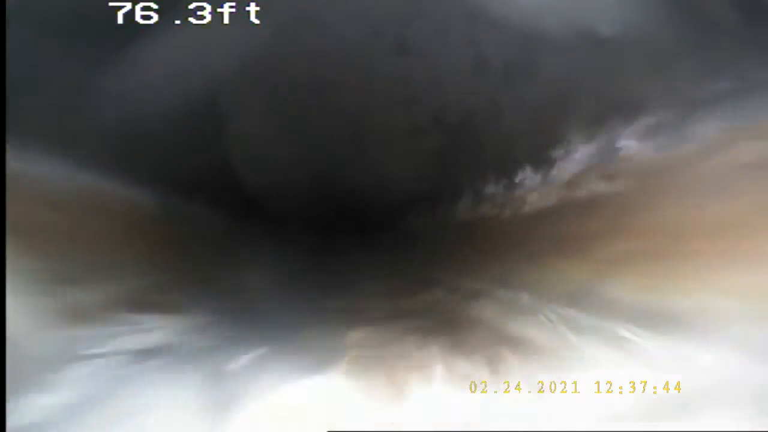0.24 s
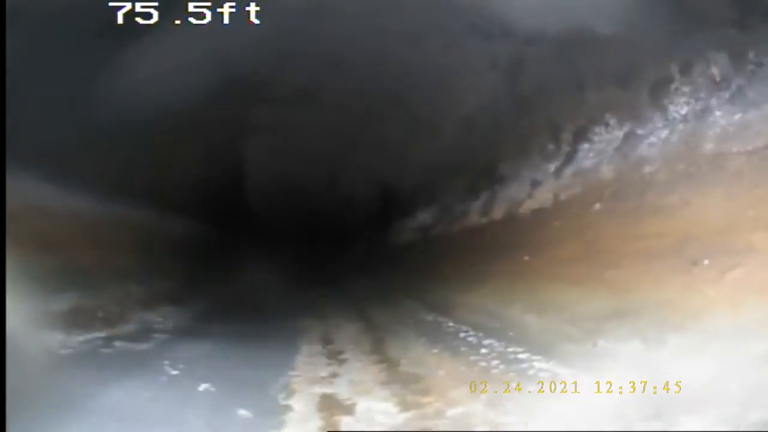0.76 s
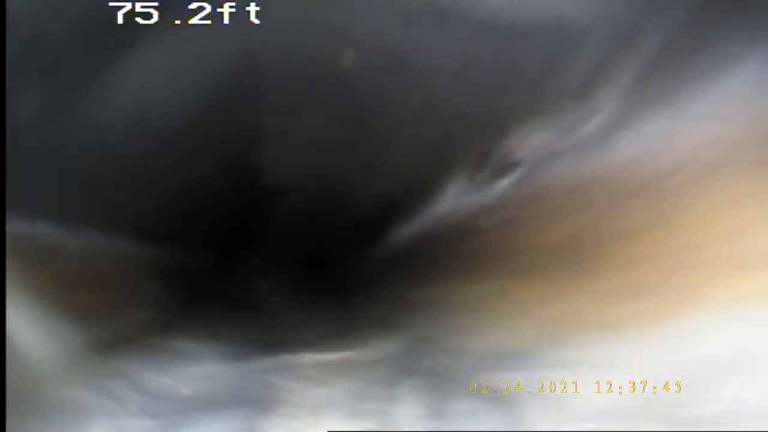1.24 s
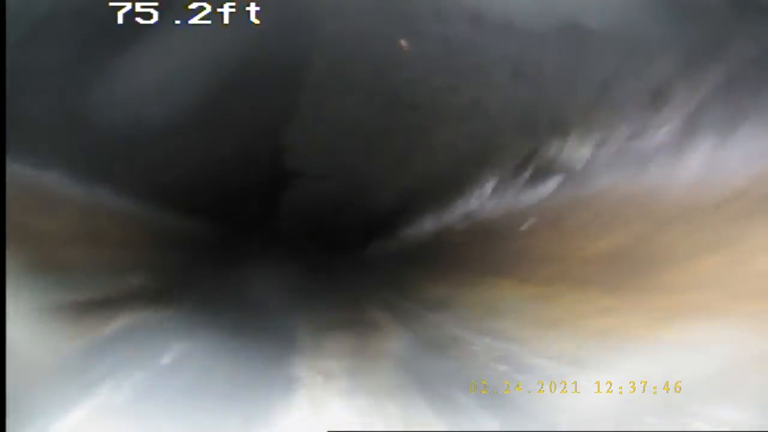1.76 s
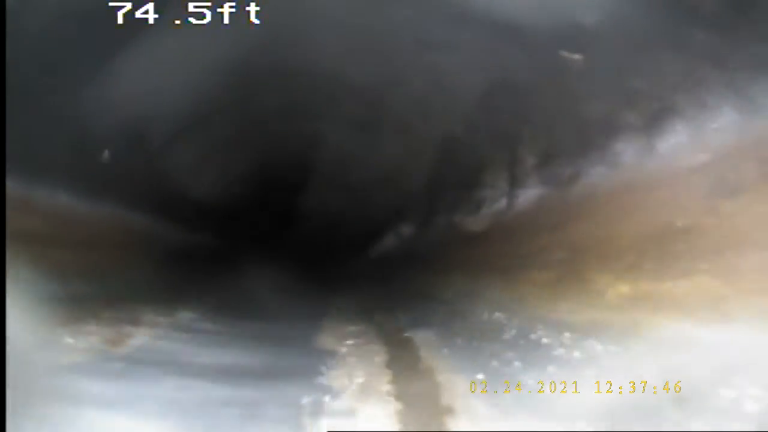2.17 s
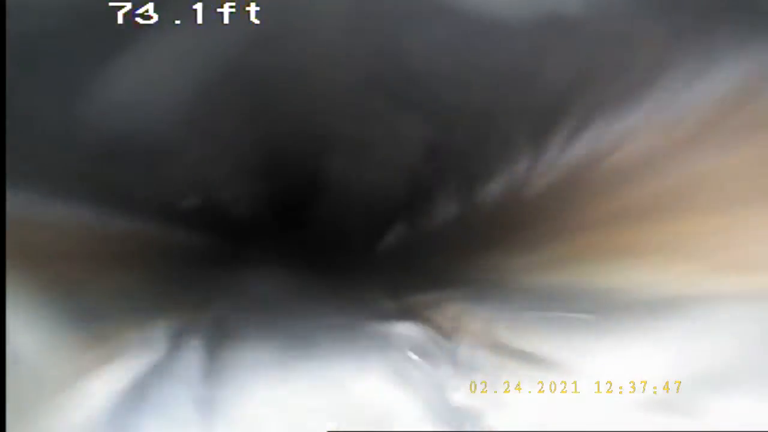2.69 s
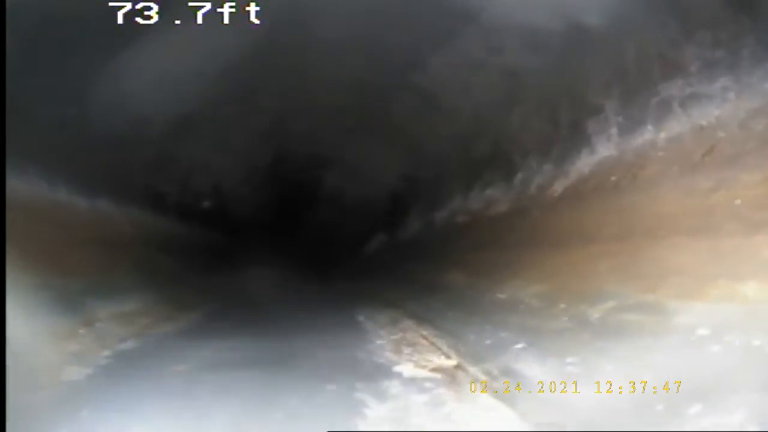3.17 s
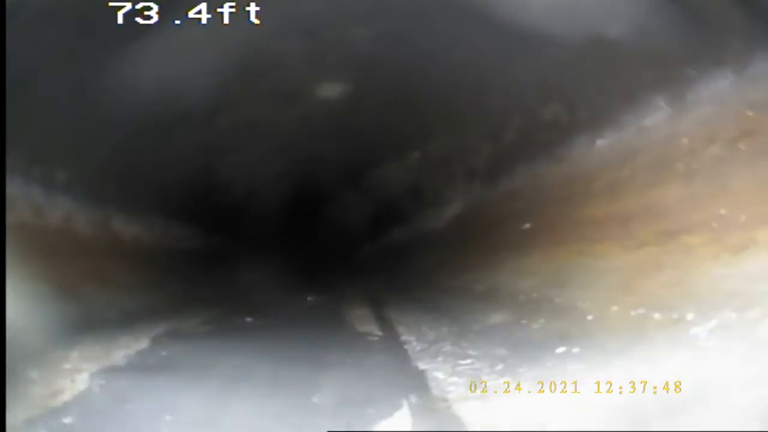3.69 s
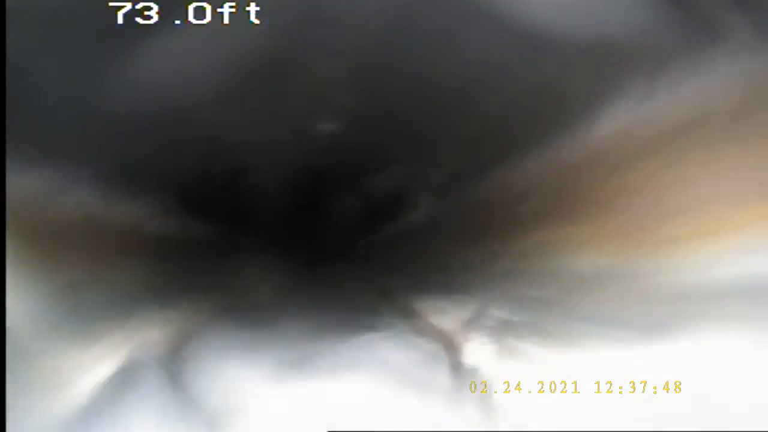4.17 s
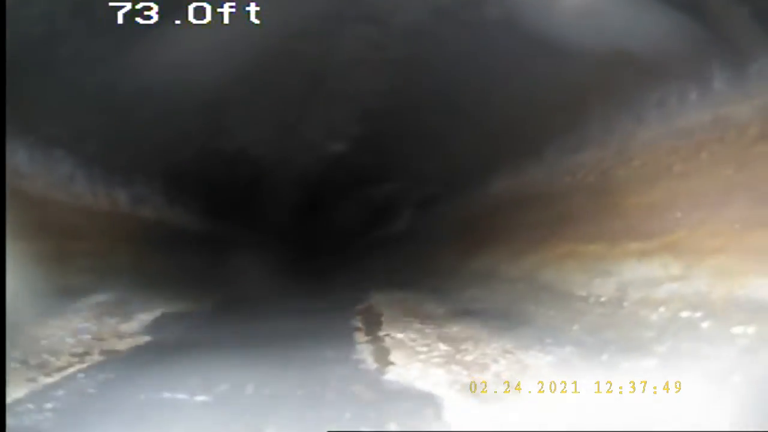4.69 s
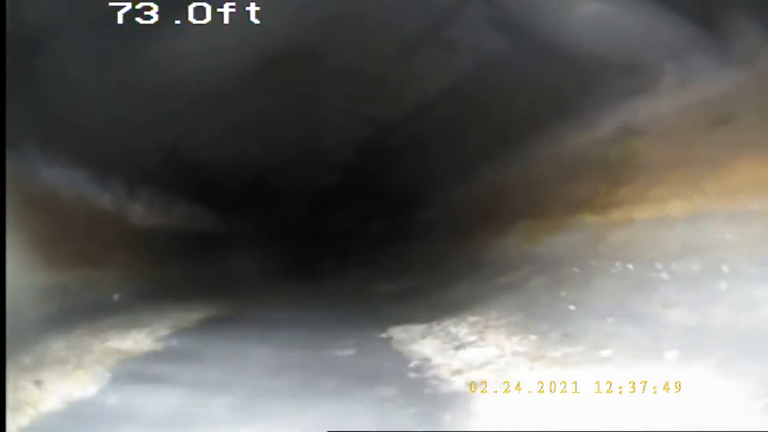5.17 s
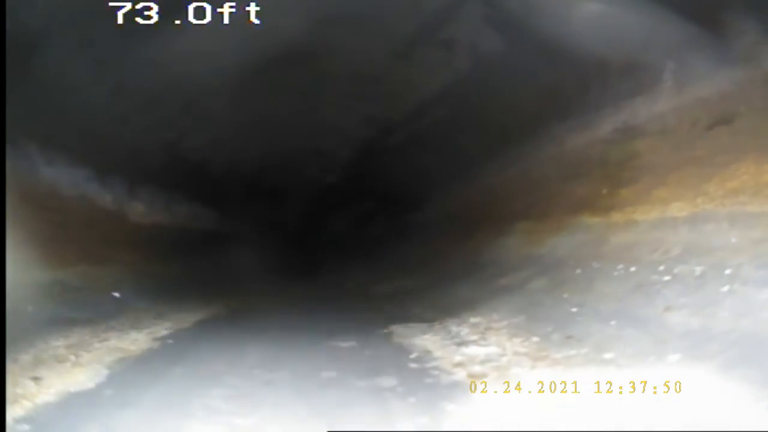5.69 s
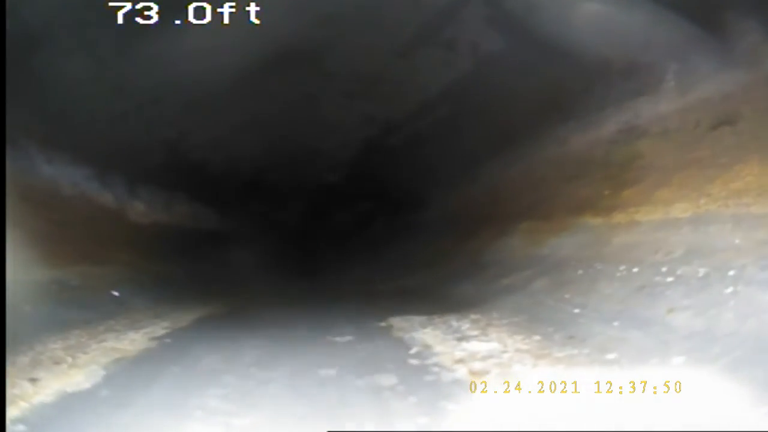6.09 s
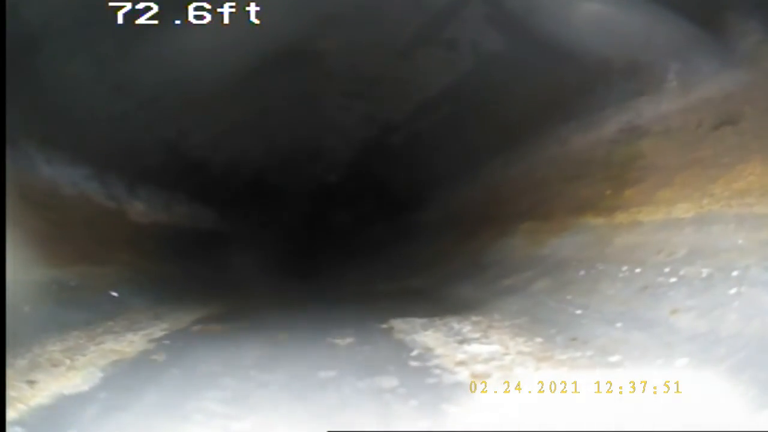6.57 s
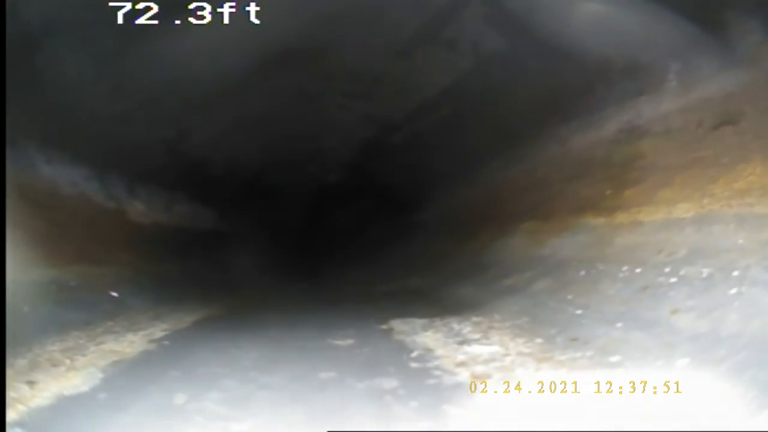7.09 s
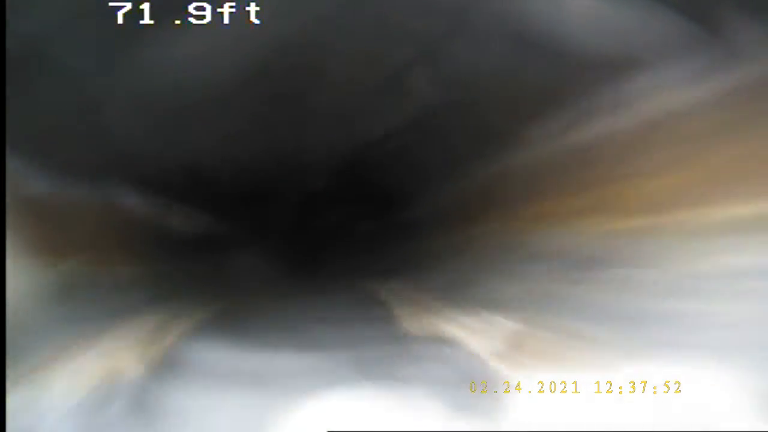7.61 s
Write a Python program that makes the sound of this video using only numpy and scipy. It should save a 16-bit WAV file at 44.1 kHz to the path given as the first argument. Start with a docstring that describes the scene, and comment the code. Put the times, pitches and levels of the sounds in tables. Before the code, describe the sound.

Close, boxy, dull-toned sound picked up through a cable reel: rough scraping strokes two or three times a second, each shaking the frame with a deep wooden-metallic rumble. Early knocks are moderate, then it calms to quieter drags. Hard overloaded thuds with clacks come past the middle, followed by two cracking whips against the wire cage. It finishes with smaller pulls and crisp ticks over near-silence between tugs, with no room echo.

```python
"""A stiff inspection cable is dragged out of a pipe, hand over hand, onto its reel: slips rasp and shake the reel.
Fine slips excite jacket and guide resonances; coarse ones drive the frame, drum and cage.
Now and then filtered noise bursts tick, clink, slap and jolt against the reel.
Everything passes one narrow-band input that clips, cracks at set peaks and adds faint hiss."""
import sys
import numpy as np
from scipy import signal
from scipy.fft import rfft, irfft
from scipy.io import wavfile
from scipy.ndimage import uniform_filter1d

SR = 44100
rng = np.random.default_rng(int(sys.argv[2]) if len(sys.argv) > 2 else 0)


def pcm_store(signal):
    """Save signal as 16-bit PCM."""
    levels = np.round(np.clip(np.atleast_2d(signal), -1, 1) * 32767)
    wavfile.write(sys.argv[1], SR, levels.astype(np.int16).T)


N = 346185
TIME_S = np.arange(N) / SR
CLOCK_S = np.arange(0, N / SR, .002)  # coarse grid for levels


# Resonances of the swaying frame: centre_hz [Hz], width_hz [Hz], level_db [dB relative]
FRAME_MODES = [(74.3, 24, -7.5), (101.76, 18, 7), (125.6, 22.2, 6)]
# Resonances of the reel drum: centre_hz [Hz], width_hz [Hz], level_db [dB relative]
DRUM_MODES = [(177.2, 24, 5)]
# Resonances of the wire cage: centre_hz [Hz], width_hz [Hz], level_db [dB relative]
CAGE_MODES = [(232.5, 59, -0.5), (268.6, 21, 4.5), (309, 51, 3.5), (377, 27, 2), (432, 120, -3),
              (468, 39.3, 2), (504.3, 89, -4), (555.3, 58, -8)]
# Hollow ring of the guide: centre_hz [Hz], width_hz [Hz], level_db [dB relative]
GUIDE_MODES = [(669, 110, -7.5), (757, 68, -3.5), (953, 210, -6), (1043, 96, -0.5), (1113, 41, 0),
               (1258, 130, -3), (1473, 65, 5), (1597, 65, -6.5)]
# Sliding cable jacket: centre_hz [Hz], width_hz [Hz], level_db [dB relative]
JACKET_MODES = [(1140, 550, -3), (1943, 190, 2.5), (2166, 220, -2), (2520, 880, -6), (3204, 420, -3.5),
                (3790, 770, -11)]
# fall in dB per s, level between pulls in dB
FRAME_SETTLES, DRUM_SETTLES, CAGE_SETTLES = (107, -34), (91, -40), (135, -43)
CREEP_DB, CREEP_DB_PER_DB = -45.5, .36  # faint rasp between pulls follows the rattle
GUIDE_DB, GUIDE_DB_PER_DB = -30.5, .55  # the cage's rattle stirs the guide
CHATTER_DB = -23.5  # cable against the rattling cage, relative to the rattle
HEAVY_DB, HEAVY_DB_PER_DB = -15.5, .47  # rumble at which the deepest modes take over, and how abruptly
SUB_DB, SUB_DB_PER_DB = -33.5, .35  # deepest rumble follows the frame
LOWEST_HZ = 36  # the frame hardly moves below this


def dragging():
    """Coarse slips shake frame, drum and cage; fine ones rasp along the jacket and ring the guide."""
    rumble_db = shaken(*FRAME_SETTLES, part=0)
    hum_db = shaken(*DRUM_SETTLES, part=1)
    rattle_db = shaken(*CAGE_SETTLES, part=2)
    rasp_db = sliding(CREEP_DB + CREEP_DB_PER_DB * rattle_db, part=0)
    guide_db = sliding(GUIDE_DB + GUIDE_DB_PER_DB * rattle_db, part=1)
    coarse = slips(per_s=220, spread_db=4.5)
    fine = slips(per_s=9000, spread_db=3.0)

    sway = 1 / (1 + amp(-HEAVY_DB_PER_DB * (rumble_db - HEAVY_DB)))  # 0 light, 1 heavy
    frame = loaded(FRAME_MODES, sway, light_db_per_oct=8, heavy_db_per_oct=-8, seconds=.093)
    highpass = signal.butter(2, LOWEST_HZ, "highpass", fs=SR, output="sos")
    frame = signal.sosfiltfilt(highpass, frame)
    drum = steadied(ring(coarse, DRUM_MODES, order=3), seconds=.08)
    cage = loaded(CAGE_MODES, sway, light_db_per_oct=2, heavy_db_per_oct=-3.5, seconds=.07)
    sub_bass = amp(SUB_DB + SUB_DB_PER_DB * rumble_db) * ring(rng.standard_normal(N), [(39, 270, 0)])
    shaking = amp(rumble_db) * frame + amp(hum_db) * drum + amp(rattle_db) * cage + sub_bass

    guide = amp(guide_db) * shifting(fine + .5 * coarse, GUIDE_MODES, swell_db=4.0)
    chatter = amp(CHATTER_DB + rattle_db) * ring(fine, CABLE_MODES[1:])
    rasp = amp(rasp_db) * shifting(fine, JACKET_MODES, swell_db=2.5)
    return shaking + guide + chatter + rasp


# Strokes of the cable through the guide, one per pull: start_s [s], end_s [s], jacket_rasp_db [dB],
# guide_ring_db [dB], frame_rumble_db, drum_hum_db, cage_rattle_db [dB, before the breakaway boost]
PULLS = [(0.118, 0.42, -46, -38, -24, -22.5, -31), (0.484, 0.682, -51.5, -49.5, -36.5, -45, -53),
         (0.881, 1.177, -48, -43.5, -28.5, -30.5, -40), (1.248, 1.402, -45, -53, -25, -26.5, -34),
         (1.677, 1.978, -48, -41.5, -30, -26, -36), (2.054, 2.189, -48, -60, -28.5, -29.5, -37),
         (2.457, 2.72, -48, -43.5, -43.5, -26, -37), (2.809, 3.02, -50.5, -59.5, -36.5, -39, -44),
         (3.168, 3.464, -48.5, -40.5, -29.5, -20.5, -36), (3.512, 3.739, -48.5, -50, -21, -27.5, -31.5),
         (3.908, 4.24, -51, -42, -28.5, -27, -33), (4.329, 4.514, -43, -38, -28.5, -25.5, -22),
         (4.862, 5.076, -49.5, -62, -26, -43.5, -44), (5.177, 5.787, -46.5, -45, -26.5, -35.5, -26.5),
         (5.512, 5.55, -31, -26, -31.5, -33, -50), (6.132, 6.488, -53, -42.5, -37, -32, -39),
         (6.636, 6.944, -51, -44.5, -34.5, -27.5, -35), (6.946, 7.06, -40, -34.5, -46, -28, -36.5),
         (7.096, 7.384, -58, -45, -48, -39, -39.5), (7.418, 7.607, -42.5, -36.5, -29.5, -27, -32.5),
         (7.704, 7.88, -49, -40.5, -37, -27, -33)]
# The cable catches and the reel lurches: peak_s [s], build_up_s [s], frame_rumble_db [dB],
# drum_hum_db [dB], cage_rattle_db [dB]
LURCHES = [(0.0, .03, -19.5, -28, -33), (0.383, 0.024, -12.5, -12.5, -18.5), (0.575, 0.035, -17, -48, -24),
           (0.969, 0.082, -27, -22, -27), (2.625, 0.091, -15.5, -22, -33.5), (2.899, 0.06, -21.5, -26, -28),
           (3.065, 0.068, -16, -21, -45), (3.662, 0.08, -11, -18.5, -20), (4.42, 0.051, -5.5, -31.5, -24),
           (4.692, 0.16, -23, -50.5, -33), (4.971, 0.12, -8.5, -17, -17), (5.26, 0.053, -5.5, -27.5, -15),
           (5.535, .065, -16, -18, -34.5), (5.703, 0.084, -3.5, -18, -11),
           (6.061, 0.088, -12, -18.5, -21.5), (6.249, 0.073, -16.5, -27.5, -22.5)]
PULL_RISE_S = .076
BREAKAWAY_DB, BREAKAWAY_S = 10, .047  # shakes hardest as the cable breaks free, then settles


def shaken(fall_db_per_s, rest_db, part):
    """Level in dB of a reel part (0 frame, 1 drum, 2 cage): pulls and lurches add power, which then falls."""
    power = amp(rest_db) ** 2
    for start_s, end_s, _, _, *part_db in PULLS:
        breakaway_db = BREAKAWAY_DB * np.exp(-np.maximum(CLOCK_S - start_s, 0) / BREAKAWAY_S)
        push = swell(start_s, PULL_RISE_S, end_s, fall_db_per_s)
        power = power + (amp(part_db[part] + breakaway_db) * push) ** 2
    for peak_s, rise_s, *part_db in LURCHES:
        push = swell(peak_s - rise_s, rise_s, peak_s, fall_db_per_s)
        power = power + (amp(part_db[part]) * push) ** 2
    return np.interp(TIME_S, CLOCK_S, 10 * np.log10(power))


def swell(start_s, rise_s, end_s, fall_db_per_s):
    """Attack, hold and release of a push on the reel."""
    attack = np.clip((CLOCK_S - start_s) / max(rise_s, .005), 0, 1)
    return attack * amp(-fall_db_per_s * np.maximum(CLOCK_S - end_s, 0))


STROKE_RAMP_S = .09  # gathers speed and stops in this time


def sliding(creep_db, part):
    """Level in dB of the rasp (0 jacket, 1 guide): strokes gather speed, slide evenly, stop; creep fills between."""
    strokes = 0
    for start_s, end_s, *part_db in PULLS:
        ramp = np.minimum(CLOCK_S - start_s, end_s - CLOCK_S) / STROKE_RAMP_S + .5
        strokes = strokes + amp(part_db[part]) ** 2 * np.clip(ramp, 0, 1) ** 3
    return 10 * np.log10(np.interp(TIME_S, CLOCK_S, strokes) + amp(creep_db) ** 2)


def slips(per_s, spread_db):
    """Stick-slip: a train of tiny snaps of uneven size and either sign."""
    size = amp(spread_db * np.minimum(rng.exponential(1, N), 4)) * rng.choice([-1, 1], N)
    return evened(size * (rng.random(N) < per_s / SR))


def loaded(modes, sway, light_db_per_oct, heavy_db_per_oct, seconds):
    """Slips shake a reel part; its spectral tilt goes from light to heavy as the sway grows."""
    def shake(tilt):
        snaps = slips(per_s=400, spread_db=2.5)
        return steadied(ring(snaps, modes, tilt_db_per_oct=tilt, order=3), seconds)
    light, heavy = shake(light_db_per_oct), shake(heavy_db_per_oct)
    return np.sqrt(1 - sway) * light + np.sqrt(sway) * heavy


def shifting(x, modes, swell_db):
    """The point of contact moves, so each resonance swells and fades on its own."""
    total = 0
    for hz, width_hz, db in modes:
        level = amp(db + swell_db * wander(hz=18)) * np.sqrt(width_hz)
        total = total + level * ring(x * rng.choice([-1, 1], N), [(hz, width_hz, 0)])
    return evened(total)


# Heavy jolts of the reel: start_s [s], level_db [dB relative], decay_t60_s [s], guide_clack_db [dB]
JOLTS = [(0.154, -14, 0.18, -24.5), (0.367, -11.5, 0.16, -27.5), (0.521, -12.5, 0.23, -30.5),
         (1.302, -19.5, 0.07, -30), (3.22, -16.5, 0.25, -32.5), (3.641, -3.5, 0.22, -25),
         (4.228, -17, 0.14, -43), (4.394, -6.5, 0.32, -26), (4.423, -2.5, 0.14, -20.5),
         (5.228, -11, 0.32, -30.5), (5.501, -11.5, 0.19, -42), (5.674, -8.5, 0.21, -26),
         (6.046, -10.5, 0.07, -25.5), (6.077, -10.5, 0.064, -34.5), (6.247, -15, 0.15, -27.5),
         (6.69, -18, 0.28, -30.5)]


def snags(depth=.14, seconds=.2):
    """Gain that dips just before each jolt as the cable catches, then recovers fast as it breaks free."""
    held = 0
    for s, *_ in JOLTS:
        before = np.clip(1 - (s - TIME_S) / seconds, 0, 1)
        after = np.clip(1 - (TIME_S - s) / .0069, 0, 1)
        held = held + before * after
    return 1 - np.clip(depth * held, 0, 1)


def jolts():
    """Heavy knocks ring frame and cage together, with a short clack in the guide."""
    out = np.zeros(N)
    for s, db, t60_s, clack_db in JOLTS:
        force = burst(t60_s, rise_s=.00018)
        low = evened(ring(force, FRAME_MODES, tilt_db_per_oct=1.5))
        mid = evened(ring(force, CAGE_MODES))
        add(out, s, amp(db) * force.std() * amp(-2.0) * (low + mid))
        add(out, s, amp(clack_db) * ring(burst(t60_s=.12, rise_s=.001), GUIDE_MODES))
    return out


# Hard whips against the cage: start_s [s], crack_db [dB], crack_t60_s [s, burst floor 0.01],
# clatter_db [dB], clang_db [dB]
SLAPS = [(6.021, 3.5, 0.0079, -3.5, -9), (6.241, 0.5, 0.036, -6.5, 3)]
# Thin cage wires when struck: centre_hz [Hz], width_hz [Hz], level_db [dB relative]
WIRE_MODES = [(993, 120, 0), (1245, 210, -1.5), (1480, 62, 2.5), (1993, 81, 0.5)]
# Cage hoop when struck: centre_hz [Hz], width_hz [Hz], level_db [dB relative]
HOOP_MODES = [(517, 206, -4.5), (1128, 64, -5)]


def slaps():
    """Higher bending waves run faster: bright crack and wire clatter start together, the hoop clangs 3.3 ms later."""
    crack, clatter, clang = np.zeros((3, N))
    for s, crack_db, t60_s, clatter_db, clang_db in SLAPS:
        add(crack, s, amp(crack_db) * burst(t60_s, rise_s=.00095))
        add(crack, s - .006, amp(-14.5) * burst(t60_s=.042, rise_s=.012))  # the cable grazes first
        add(clatter, s, amp(clatter_db) * burst(t60_s=.045, rise_s=.00088))
        add(clang, s + .0033, amp(clang_db) * burst(t60_s=.053, rise_s=.0011))
    return ring(crack, EDGE_MODES + CABLE_MODES[2:]) + ring(clatter, WIRE_MODES) + ring(clang, HOOP_MODES)


# Cable ticks against the guide: contact_s [s], ring_db [dB], bright_edge_db [dB]
TICKS = [(0.0654, -36, -41.5), (0.151, -22, -38.5), (0.3648, -17.5, -35), (0.5183, -28, -37),
         (0.847, -30, -40), (1.362, -23.5, -53), (1.4098, -29.5, -40.5), (1.625, -24, -40),
         (1.6753, -27, -39.5), (2.4432, -32.5, -41.5), (3.0092, -25.5, -35.5), (3.217, -23.5, -42),
         (3.613, -19, -35), (3.637, -11, -32), (3.8052, -31.5, -39), (3.929, -24.5, -30),
         (4.2268, -10, -25), (4.343, -22.5, -39), (4.3948, 1.5, -21.5), (5.236, -25, -35),
         (5.508, -18, -29.5), (5.612, -20, -38.5), (5.68, -5, -24), (5.876, -12, -33), (6.0478, -13, -34),
         (6.07, -15, -33), (6.099, -7, -16.5), (6.202, -18, -31), (6.2308, -13, -24), (6.369, -22.5, -35.5),
         (6.8578, -16.5, -36.5), (7.0323, -20.5, -35.5), (7.138, -19.5, -37.5), (7.1694, -20.5, -37),
         (7.3718, -18.5, -30.5), (7.4047, -20.5, -36), (7.5532, -10.5, -24.5), (7.7712, -17, -32)]
# Thin clinks as the cable barely touches a wire: contact_s [s], level_db [dB]
CLINKS = [(0.635, -32), (2.1952, -29.5), (2.2563, -32), (2.281, -36.5), (3.136, -38.5), (6.1624, -31),
          (6.1842, -27), (6.4036, -32), (7.323, -33)]
# Ring of the struck cable: centre_hz [Hz], width_hz [Hz], level_db [dB relative]
CABLE_MODES = [(457, 170, 13), (1080, 160, 5.5), (1430, 340, -0.5), (1980, 200, 3), (2200, 350, -4.5)]
# Bright edge of a tick: centre_hz [Hz], width_hz [Hz], level_db [dB relative]
EDGE_MODES = [(3140, 1500, -1.5), (3610, 1400, -13.5)]
TICK_LEAD_S = .002  # bursts start this long before contact_s


def ticks():
    """Short scuffs ring the cable and leave a bright edge; the lightest touches stir only its upper modes."""
    body, edge, clink = np.zeros((3, N))
    for s, ring_db, edge_db in TICKS:
        add(body, s - TICK_LEAD_S, amp(ring_db) * burst(t60_s=.066, rise_s=.004))
        add(edge, s - TICK_LEAD_S, amp(edge_db) * burst(t60_s=.044, rise_s=.0017))
    for s, db in CLINKS:
        add(clink, s - TICK_LEAD_S, amp(db) * burst(t60_s=.037, rise_s=.0012))
    return ring(body, CABLE_MODES) + ring(edge, EDGE_MODES) + ring(clink, CABLE_MODES[2:])


def burst(t60_s, rise_s, size=22050):
    """A contact that chatters (random signs) and dies away by 60 dB in t60_s."""
    t = np.arange(size) / SR
    attack = 1 - np.exp(-t / max(rise_s, 1e-4))
    decay = np.exp(-np.log(1000) * t / max(t60_s, 1e-2))
    return rng.choice([-1, 1], size) * attack * decay


def ring(x, modes, tilt_db_per_oct=0, order=2, size=16384):
    """Causal minimum-phase filter of unit energy made of resonances; a higher order has steeper flanks."""
    hz = abs(np.fft.fftfreq(size, 1 / SR))
    power = sum(amp(db) ** 2 / (1 + (2 * (hz - f) / width) ** 2) ** order for f, width, db in modes)
    log_gain = np.log(power + 1e-12) / 2 + np.log(amp(tilt_db_per_oct)) * np.log2(hz + 20)
    taps = np.fft.ifft(np.exp(np.conj(signal.hilbert(log_gain)))).real[:size // 2]
    return signal.oaconvolve(x, taps / np.linalg.norm(taps))[:len(x)]


def steadied(x, seconds):
    """Evens out slow swells and keeps the fast grain."""
    width = int(seconds * SR)
    power = uniform_filter1d(uniform_filter1d(x ** 2, width), width)
    return x / np.sqrt(abs(power) + 1e-12)


def wander(hz):
    """Slow chance of unit RMS that changes about hz times a second."""
    f = np.fft.rfftfreq(N, 1 / SR)
    return evened(irfft(rfft(rng.standard_normal(N)) * np.exp(-(f / hz) ** 2), N))


def amp(db):
    """Amplitude factor for a level in dB."""
    return 10 ** (np.asarray(db) / 20)


def evened(x):
    """Scales to unit RMS."""
    return x / np.sqrt(np.mean(x ** 2) + 1e-20)


def add(mix, s, sound):
    """Adds sound into mix from s seconds on."""
    part = mix[max(round(s * SR), 0):][:len(sound)]
    part += sound[:len(part)]


def scene():
    """Everything reaches one microphone through the reel itself."""
    mix = snags() * dragging() + ticks() + slaps() + jolts()
    return (signal.windows.tukey(N, .001) * mix)[None]  # 4 ms fades


def band_limit(x, hz, taps):
    """Steep low-pass without delay."""
    return signal.oaconvolve(x, signal.firwin(taps, hz, window=("kaiser", 10), fs=SR), "same")


# Peaks that overflow the converter: peak_s [s], flips [count of samples]
OVERFLOWS = [(3.6442, 2), (3.6594, 1), (3.6666, 1), (4.3981, 2), (4.4082, 1), (4.4257, 1), (4.4325, 2),
             (4.4441, 3), (4.4575, 1), (4.4586, 1), (4.4661, 2), (5.0019, 1), (5.6815, 1), (5.6822, 1),
             (5.6922, 1), (5.7234, 1)]
RAIL, CEILING = .68, .715  # clip amplitudes before and after the band limit
BAND_HZ, EDGE_HZ = 4100, 16400


def record(dry):
    """The input clips; at listed peaks single samples wrap to the opposite rail and crack; faint hiss is added."""
    t = np.arange(-.004, .004, 1 / SR)
    sample_s = 1 / (2 * BAND_HZ)
    grip, swing, flips = np.zeros((3, N))
    for s, count in OVERFLOWS:
        # the wave swings from rail to rail around the peak
        add(grip, s + t[0], signal.windows.tukey(len(t)))
        add(swing, s + t[0], 1.3 * RAIL * np.cos(1.25 * np.pi * t / t[0]))
        for k in range(count):
            add(flips, s + 2 * k * sample_s, np.array([-2 * RAIL * sample_s * SR]))
    x = np.clip(dry[0], -RAIL, RAIL)
    x = x + np.minimum(grip, 1) * (np.clip(swing, -RAIL, RAIL) - x) + flips
    x = np.clip(band_limit(x, BAND_HZ, taps=171), -CEILING, CEILING)  # the filter's overshoot clips again
    hiss = amp(-103) * rng.standard_normal(N)
    return band_limit(x + hiss, EDGE_HZ, taps=255)[None]


dry = scene()
out = record(dry)
pcm_store(out)
```